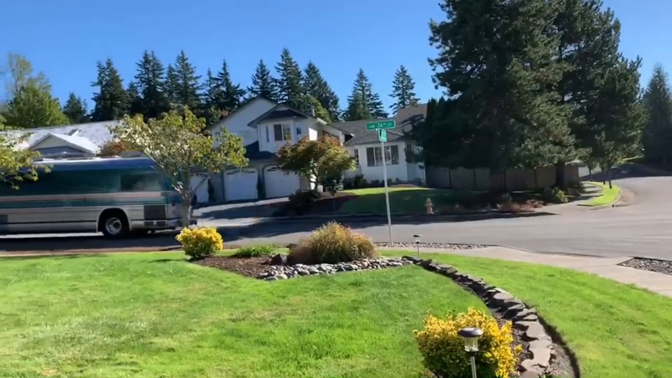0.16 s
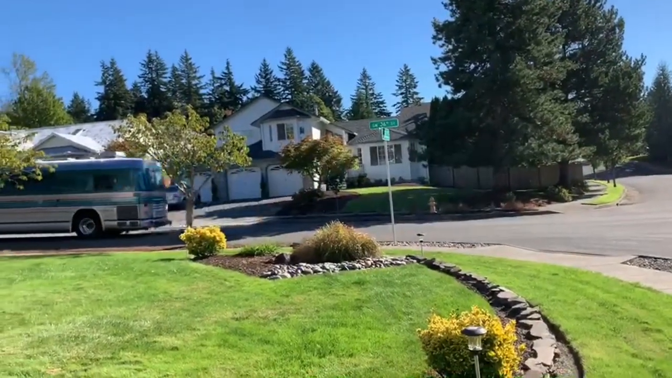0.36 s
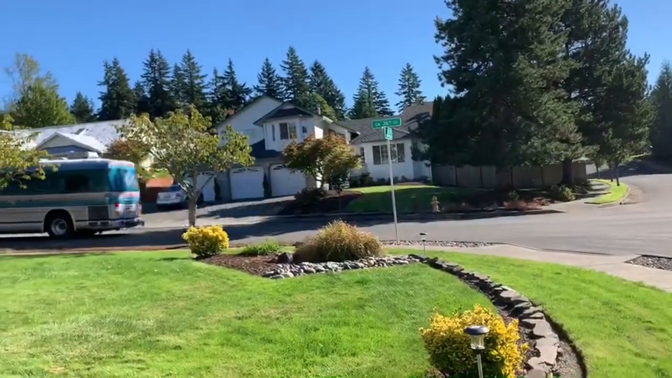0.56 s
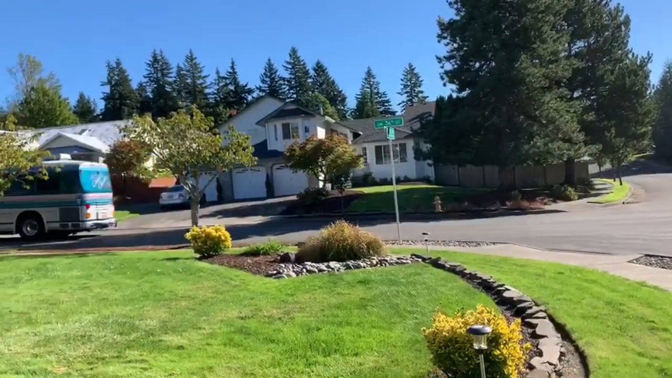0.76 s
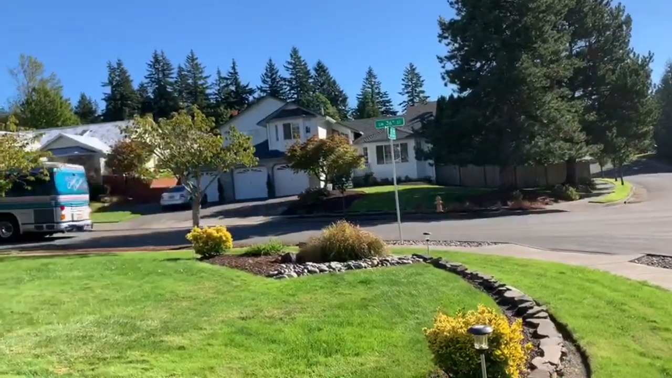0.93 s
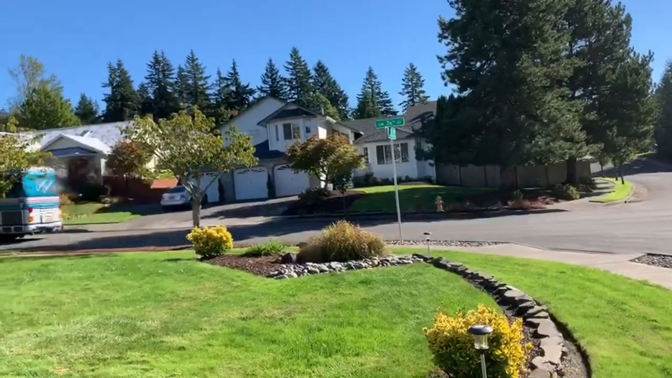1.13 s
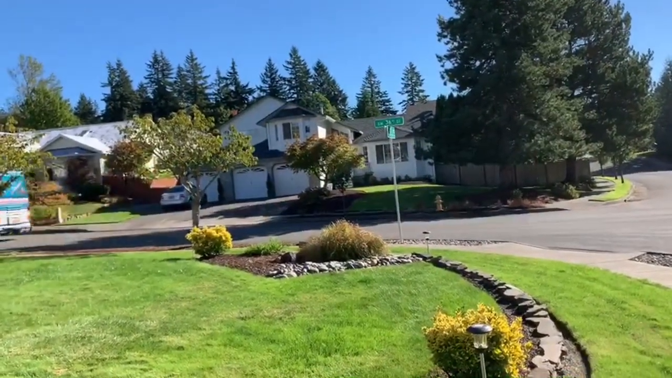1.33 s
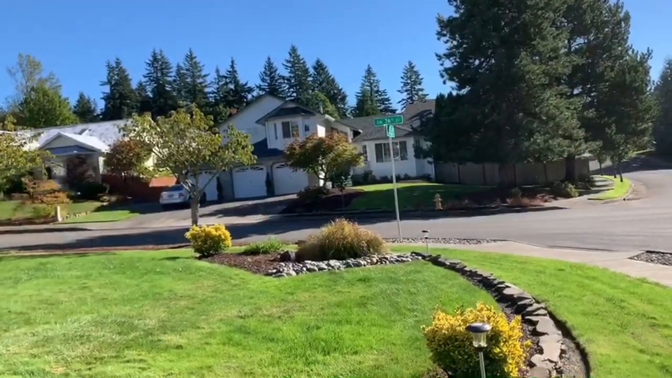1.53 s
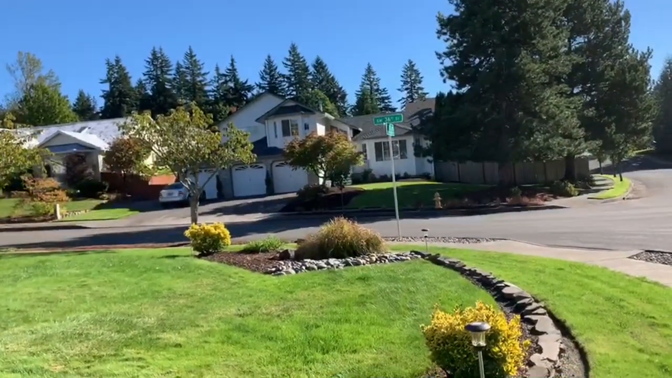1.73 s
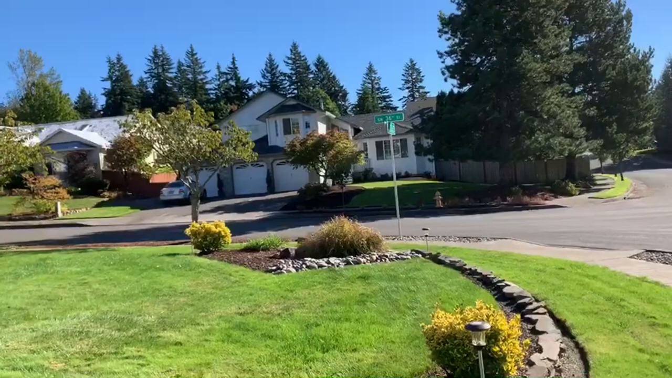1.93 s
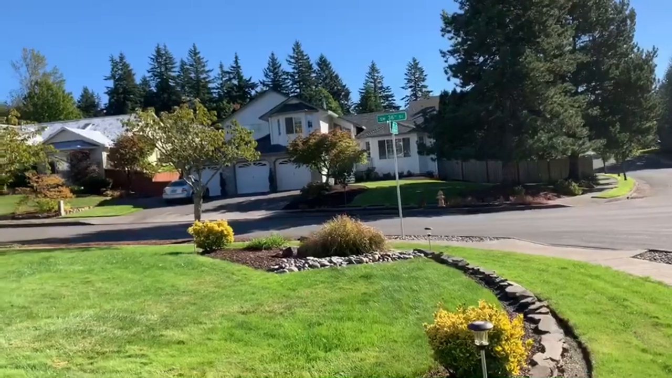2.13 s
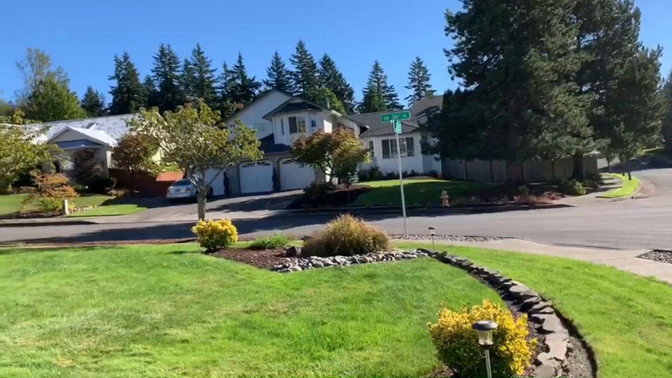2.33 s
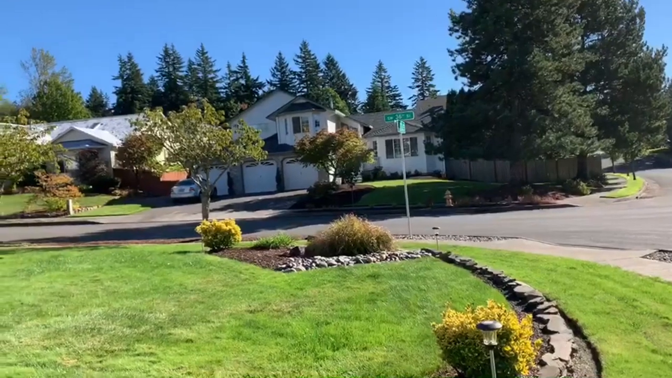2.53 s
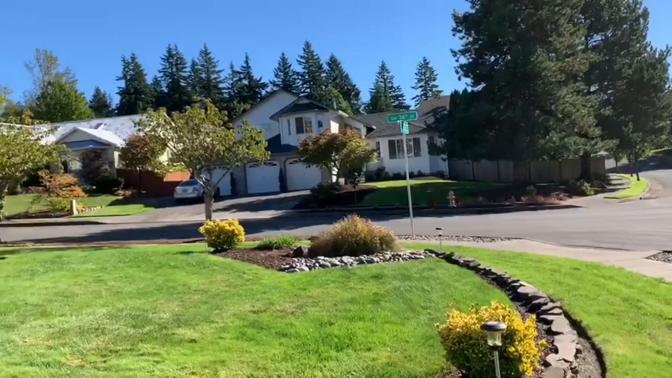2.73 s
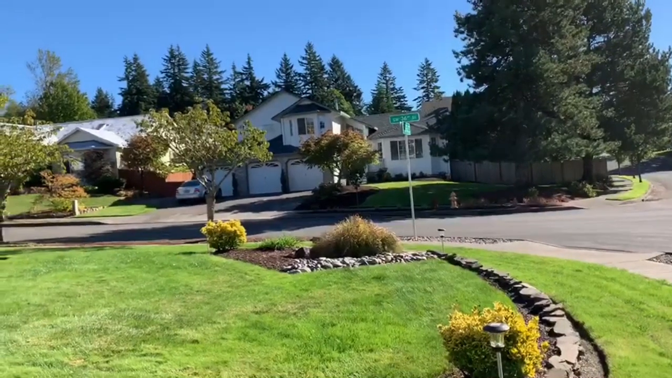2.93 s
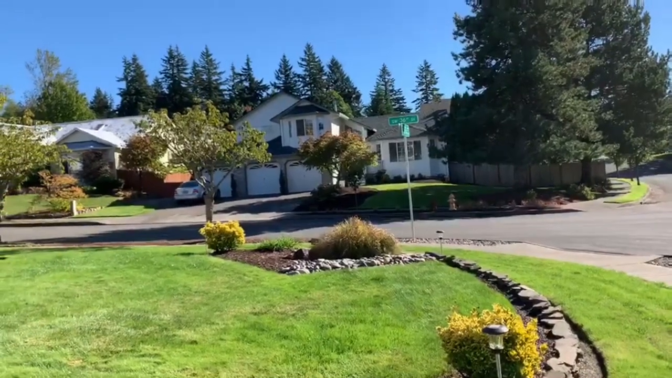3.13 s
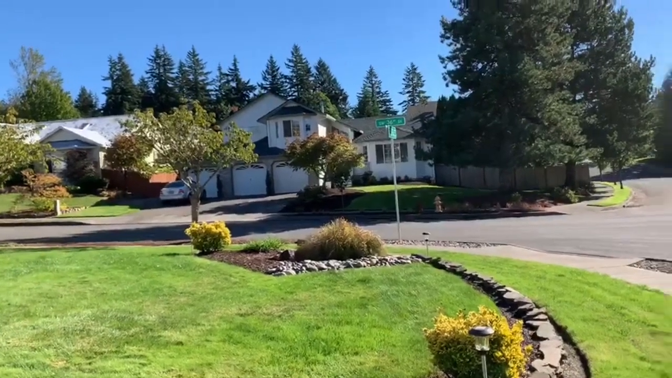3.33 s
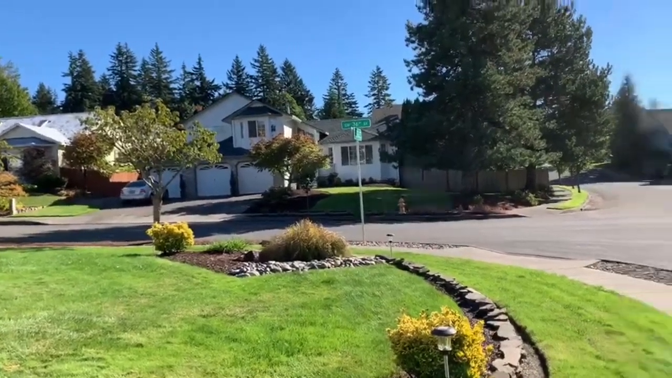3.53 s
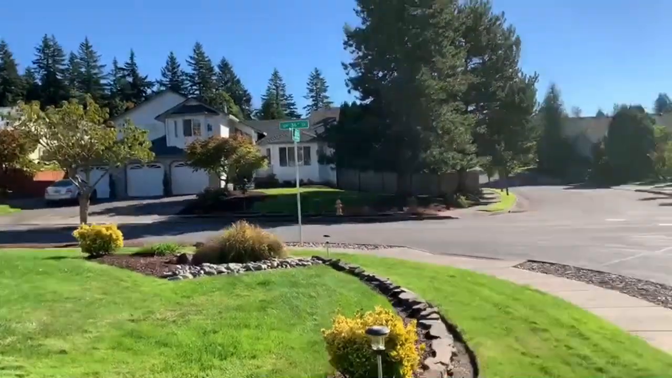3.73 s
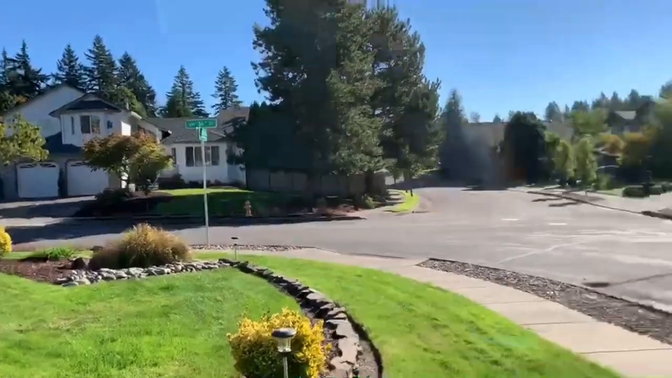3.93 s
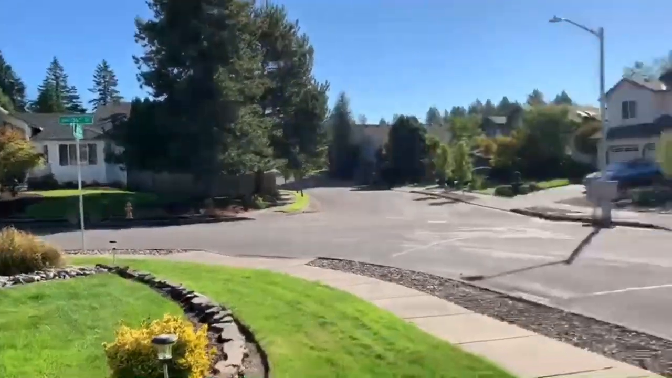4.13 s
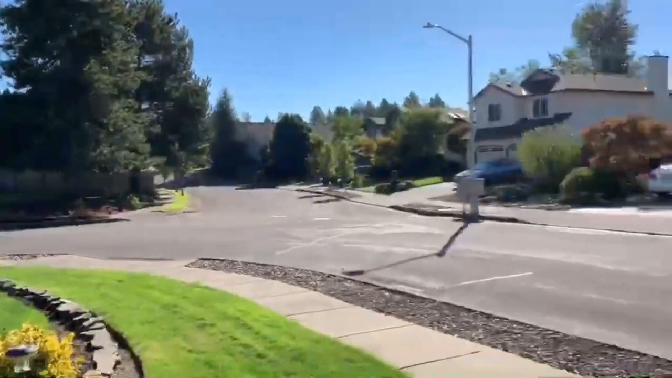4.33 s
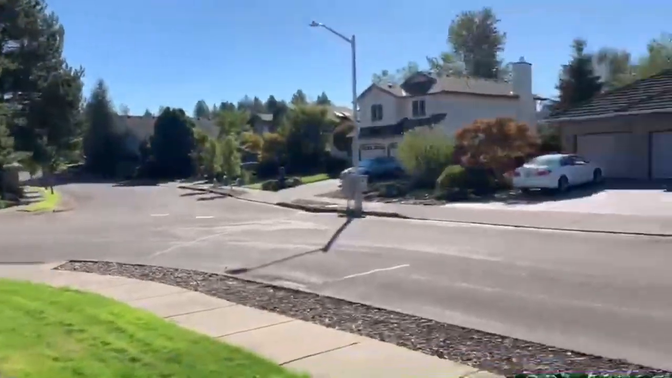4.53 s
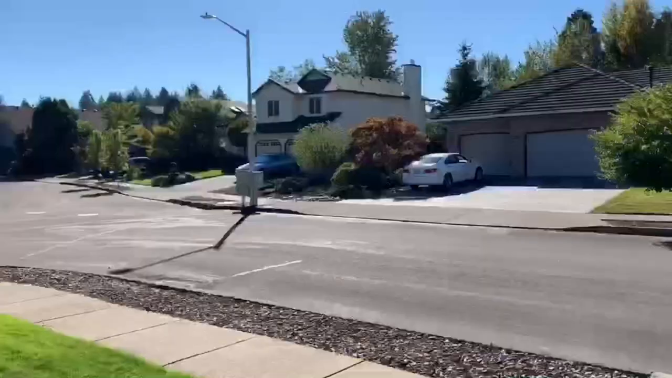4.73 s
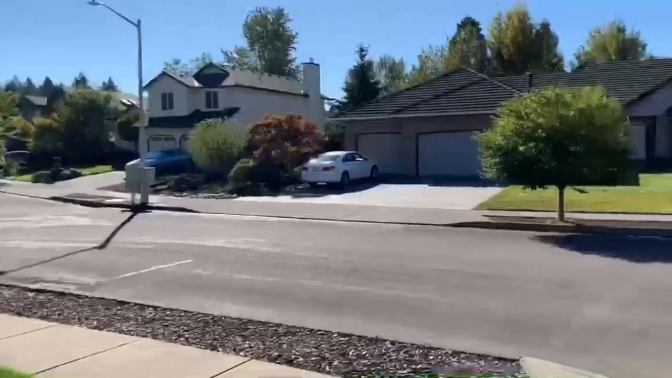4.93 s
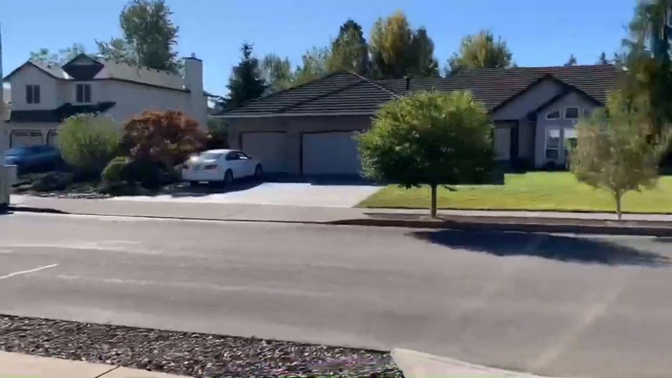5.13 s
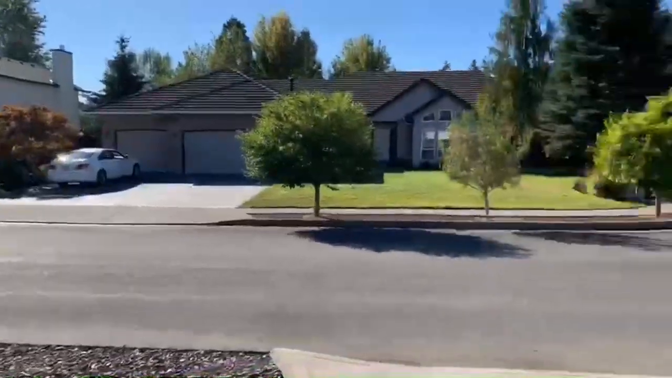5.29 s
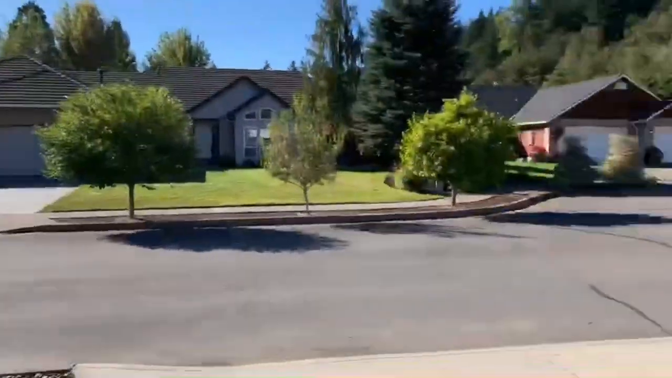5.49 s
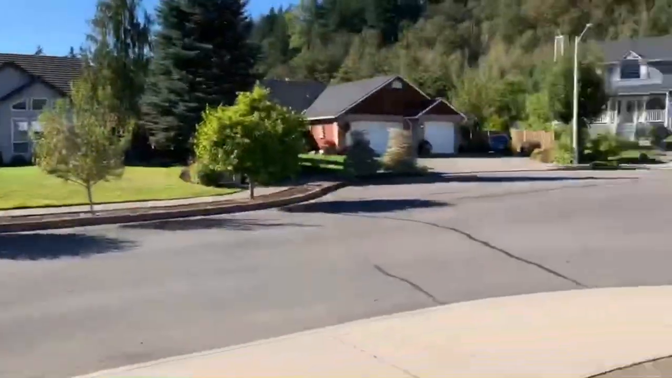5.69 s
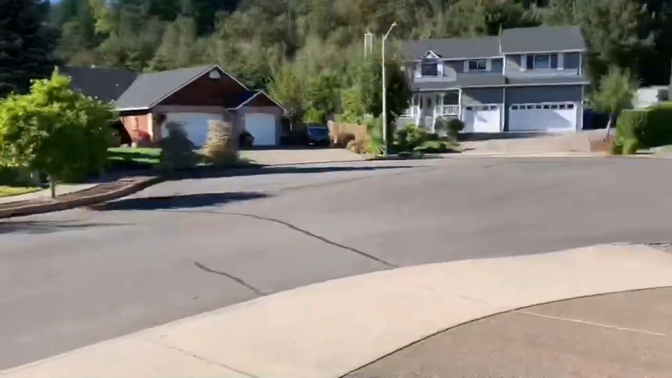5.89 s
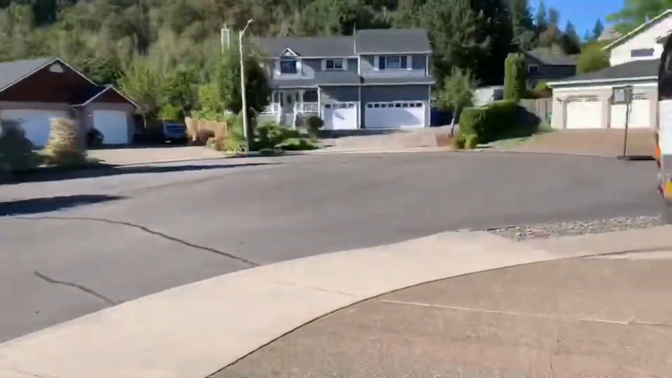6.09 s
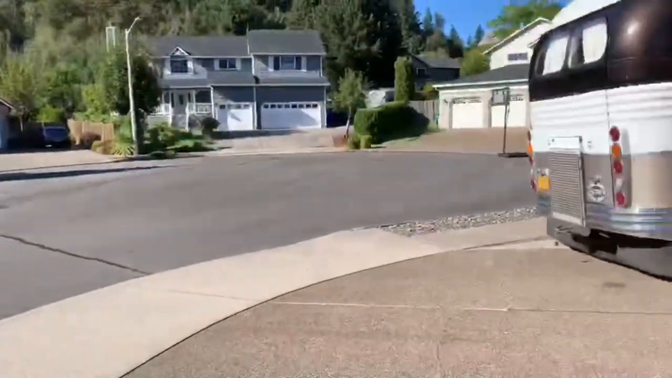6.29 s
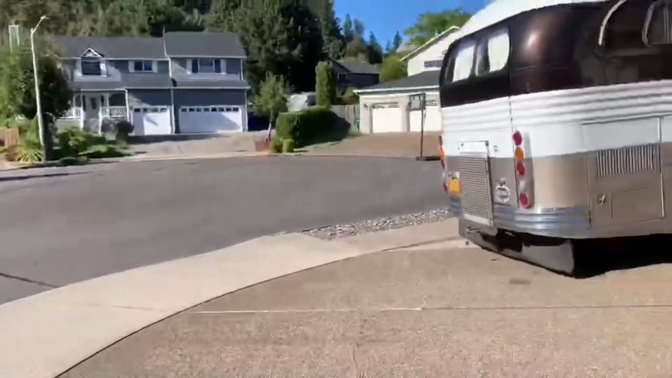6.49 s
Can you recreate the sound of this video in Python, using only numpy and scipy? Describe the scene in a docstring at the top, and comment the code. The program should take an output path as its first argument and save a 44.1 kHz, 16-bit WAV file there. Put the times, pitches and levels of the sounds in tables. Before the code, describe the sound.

A handheld phone in a front garden catches a large two-stroke diesel bus driving off, slightly left in stereo. Loud buzzing drone with uneven throbbing and fine mechanical clatter comes first, then a hollower, distant hum as the hiss disappears. Brief gusts rumble on the microphone and grainy rustles come from the right. The engine eases down, swelling and dipping, until little but quiet neighbourhood air and a small click remains.

```python
"""A deep exhaust drone swells and fades: an old coach pulls away up a suburban street, holds its revs, then eases off.
Its six-cylinder two-stroke diesel sounds partials locked to the crankshaft; moving echoes of house fronts make them beat.
Filtered noise, pulsed at each firing, gives the tailpipe's rasp and the engine's clatter and hiss, duller far off.
Low noise makes the coach's rumble and gusts on the microphone; hiss bursts are rustles of the phone as it swings round.
The phone's case ticks once, and a quiet neighbourhood lies behind it all."""
import sys
import numpy as np
from scipy import signal
from scipy.fft import rfft, irfft, next_fast_len
from scipy.io import wavfile
from scipy.ndimage import uniform_filter1d, map_coordinates

SR = 44100
rng = np.random.default_rng(int(sys.argv[2]) if len(sys.argv) > 2 else 0)


def transcribe(u):
    """Save the signal u as a 16-bit wav file named by the first command-line argument.

    u: samples, shape (n,) or (channels, n), limited to [-1, 1]; the rate is SR.
    q: integer samples, one column per channel.
    """
    v = np.clip(np.atleast_2d(u).T, -1, 1)
    q = np.round(v * 32767).astype(np.int16)
    wavfile.write(sys.argv[1], SR, q)


N = 288842
TIME = np.arange(N) / SR  # s

# crankshaft speed: (time [s], speed [revolutions per minute])
SPEED_CURVE = [(0, 1382), (0.6, 1411), (1.2, 1431), (2.2, 1452), (3, 1442), (4.95, 1442), (5.5, 1386),
               (6.55, 1275)]
# strength of each cylinder's puff, in firing order: level [dB]
CYLINDER_PUFFS = [-10, -4, -9, -13, -12, -6.5]
# common level curve of the engine bay's clatter and glare: (time [s], relative level [dB])
BAY_LEVEL = [(0, -40.5), (0.5, -35), (1.5, -38.5), (2.25, -36), (2.45, -41), (3.9, -43), (4.2, -46.5),
             (4.65, -43.5), (5.4, -50), (6.55, -52.5)]


def amp(db):
    """Logarithmic level: converts decibels to an amplitude ratio."""
    return 10 ** (np.asarray(db) / 20)


def unit(x):
    """Mean power: scales a signal to rms 1."""
    return x / np.sqrt(np.mean(x ** 2) + 1e-20)


def curve(rows, order=1):
    """Linear interpolation: one column of a time table, at every sample."""
    rows = np.asarray(rows)
    return np.interp(TIME, rows[:, 0], rows[:, order])


def ramp(span):
    """Linear transition: goes from 0 to 1 over a span of time."""
    return np.interp(TIME, span, [0, 1])


def drift(rate_hz):
    """Band-limited fluctuation: sixteen random sines no faster than the rate, summed to rms 1."""
    t = np.linspace(0, N / SR, 1300)
    hz, turn = rng.random((2, 16, 1))
    sines = np.sin(2 * np.pi * (rate_hz * hz * t + turn))
    return np.interp(TIME, t, unit(sines.sum(0)))


def colour(x, points):
    """Linear filtering: multiplies the spectrum by a gain given as (frequency [Hz], level [dB]) points."""
    size = next_fast_len(N)
    hz, db = np.transpose(points)
    bins_hz = np.fft.rfftfreq(size, 1 / SR)
    gain = amp(np.interp(np.log(bins_hz + 1), np.log(hz), db))
    return irfft(rfft(x, size) * gain, size)[..., :N]


def drone(turns, lead):
    """Harmonic radiation and interference: loud exhaust partials beat with house echoes, then with random scatter."""
    # the firing note swells and fades along the street: (time [s], level [dB])
    firing = [(0.06, -9), (0.91, -9.2), (1.14, -14.7), (1.39, -7.5), (1.71, -9.5), (1.96, -25.8),
              (2.15, -10.3), (2.6, -8), (3.1, -11.5), (3.8, -10), (4.09, -19), (4.44, -13.5), (5.17, -13.5),
              (5.39, -24), (5.55, -11), (5.74, -32), (5.87, -17.5), (6.25, -36.5), (6.37, -23), (6.5, -27)]
    # strong partials beside the firing note: (order [cycles per revolution], level pulling away [dB],
    # level at full revs [dB], level far off [dB], level coasting [dB]), before echoes and scatter
    strong = [(7, -26.5, -21.5, -26.5, -36.5), (8, -26, -28, -37, -47.5), (9, -22.5, -21.5, -38, -36.5),
              (12, -28.5, -24.5, -38.5, -50), (15, -33.5, -31, -42, -52.5)]
    # far down the street many weak echoes set in: (from [s], to [s])
    scatter_span = (3.0, 4.0)
    # the driver eases off: (from [s], to [s])
    easing = (4.94, 5.7)
    full_revs_s, far_s = 1.91, 3.85
    scatter, scatter_rate_hz, throb_scatter, scatter_db = 0.61, 5.5, 0.43, -0.6

    count = len(CYLINDER_PUFFS)
    scattered = ramp(scatter_span)
    out = amp(curve(firing)) * partial(turns, lead, count)
    for k, start_db, near_db, far_db, coasting_db in strong:
        times = [0, full_revs_s, far_s, *easing]
        db = np.interp(TIME, times, [start_db, near_db, far_db, far_db, coasting_db])
        share = scattered
        if k == count + 1:
            # the partial just above the firing note keeps up its throb until the driver eases off
            share = scattered * np.maximum(throb_scatter, ramp(easing))
        waver = scatter * share * (drift(scatter_rate_hz) + 1j * drift(scatter_rate_hz))
        path_gain = house_echoes(k * curve(SPEED_CURVE) / 60) + waver
        out += amp(db + scatter_db * share) * path_gain * partial(turns, lead, k)
    return out.real


def partial(turns, lead, k, flutter_db=0.42, jitter=0.0057):
    """Amplitude and phase modulation: one partial of k cycles a revolution at both ports, as a complex wave."""
    # the higher partials come partly as echoes from all sides, so they lean less to the left
    right_turns = turns - lead * (6 / k) * curve(SPEED_CURVE) / 60
    both = np.array([turns, right_turns])
    # no two firings are alike, and the higher partials show it more
    uneven_db = (flutter_db + 0.16 * (k - 6)) * drift(18)
    phase = jitter * (k - 5) * drift(28) - smear(k)
    # root two makes the real part's rms 1 before the flutter
    return np.sqrt(2) * amp(uneven_db) * np.exp(1j * (2 * np.pi * k * both + phase))


def smear(k):
    """Dispersion: the silencer delays each pitch differently, so the puffs come out rounded; phase lag [rad]."""
    return -np.pi * (k - 6) ** 2 / 5


def house_echoes(hz, reflect=1.13):
    """Interference: complex gain of a tone joined by echoes; changing paths make it beat, faster at higher pitch."""
    # a house front throws the note back while the coach passes: (time of greatest strength [s], half length [s],
    # extra path at that time [m], path growth [m/s], relative strength [ratio])
    houses = [(0.43, 1.05, 15.42, 3.77, 0.36), (1.47, 0.65, 17.53, -2.71, 0.40),
              (1.68, 0.6, 19.69, 2.73, 0.5), (2.37, 1.77, 17.17, 0.5, 0.28),
              (2.93, 1.07, 20.78, -0.84, 0.67), (3.18, 0.59, 20.42, 3.22, 0.36),
              (3.43, 0.79, 9.53, 0.9, 0.43)]
    sound_m_per_s = 343
    gain = 1
    for s, length, path, growth, strength in houses:
        delay = (path + growth * (TIME - s)) / sound_m_per_s
        passing = np.exp(-((TIME - s) / length) ** 2)
        gain = gain + reflect * strength * passing * np.exp(-2j * np.pi * hz * delay)
    return gain


def overtones(turns, lead, fade_db=3.5, scatter=0.49, far_loss_db=4.0, far_blur=0.8):
    """Harmonic series: weaker partials fade singly; far off the high ones weaken and echoes blur their pitch."""
    # weaker partials: (order [cycles per revolution], level relative to the pipe curve [dB])
    partials = [(3, -14.5), (4, -16.5), (5, -8), (10, -15.5), (11, -18), (13, -10), (14, -11.5),
                (16, -11.5), (17, -18), (18, -7.5), (19, -8), (20, -11.5), (21, -17), (26, -14.5),
                (27, -14.5), (28, -23.5), (32, -21), (33, -15), (36, -23.5), (39, -32), (42, -21)]
    # common level, greatest as the tailpipe swings toward the phone: (time [s], level [dB])
    pipe = [(0, -35.5), (1.0, -30.5), (2.1, -31), (2.7, -35), (3.1, -37.5), (5.0, -40), (5.5, -43.5),
            (6.55, -47)]
    both = np.array([turns, turns - .4 * lead * curve(SPEED_CURVE) / 60])
    far = np.interp(TIME, [2.4, 3.4, 5.2, 5.8], [0, .5, .6, 1])
    out = np.zeros((2, N))
    for k, db in partials:
        phase = .5 * drift(5) + far_blur * far * (k / 20) * drift(15) - smear(k)
        # phase difference between the ports
        apart = scatter * (k / 20) ** 2 * drift(4)
        level = np.sqrt(2) * amp(db + fade_db * drift(3.5) - far_loss_db * far * min(k / 13, 1))
        out += level * np.cos(2 * np.pi * k * both + phase + np.array([apart, -apart]) / 2)
    return out * amp(curve(pipe))


def rasp(turns, lead):
    """Turbulent jet noise: gas tears out of the tailpipe at each firing."""
    # spectra near and far: (frequency [Hz], relative density [dB per Hz])
    near_spectrum = [(100, -21), (170, -4), (250, 6.5), (420, 5), (530, -0.5), (650, 1), (850, 0.5),
                     (1100, -5.5), (1400, -9), (2000, -17.5), (3500, -46.5), (9000, -88.5)]
    far_spectrum = [(100, -25), (170, 4.5), (260, 3), (400, -4), (520, -1), (660, 2), (850, -8.5),
                    (1150, -8), (1450, -9), (2000, -31), (3500, -43.5), (9000, -91.5)]
    # (time [s], relative level [dB])
    exhaust = [(0, -29), (1.2, -30.5), (1.9, -33), (2.2, -34.5), (2.7, -38), (3.5, -41), (4.4, -39.5),
               (5.2, -42.5), (5.65, -49.5), (6.55, -54)]
    gas = street_noise(lead, direct=0.72, gate=puffs(turns, length=0.72, steady=0.24))
    far = np.interp(TIME, [2.3, 3.8], [0, 1])
    sound = (1 - far) * unit(colour(gas, near_spectrum)) + far * unit(colour(gas, far_spectrum))
    return sound * amp(curve(exhaust) + 2.5)


def puffs(turns, length, steady):
    """Impulsive excitation: each firing's burst decays over a share of the stroke; the cylinders are uneven."""
    count = len(CYLINDER_PUFFS)
    stroke = turns * count
    strength = amp(CYLINDER_PUFFS)[stroke.astype(int) % count]
    return steady + strength * np.exp(-(stroke % 1) / length)


def street_noise(lead, direct, gate, bend=0):
    """Direct and diffuse fields: pulsing noise from the coach's side plus smooth scatter from all around the street."""
    # the phone's body bends the wave toward the right port: (frequency [Hz], lag before scaling by bend [rad])
    body_lag = [(300, 0.24), (600, 0.89), (1000, .2), (1700, 0.15), (2350, 1.8), (3000, 0.17),
                (3800, -0.89), (5300, -0.67), (6500, -0.28)]
    direct, size = np.clip(direct, 0, 1), next_fast_len(N)
    straight = ports(echoes(gate * rng.standard_normal(N)), lead)
    lag = bend * np.interp(np.fft.rfftfreq(size, 1 / SR), *np.transpose(body_lag))
    straight[1] = irfft(rfft(straight[1], size) * np.exp(-1j * lag), size)[:N]
    scattered = rng.standard_normal((2, N))
    # direct is the share of power
    return np.sqrt(direct) * straight + np.sqrt(1 - direct) * scattered


def echoes(x, strength=0.5):
    """Comb filtering: kerb, cars and walls send late copies whose changing paths shift a ripple in the spectrum."""
    paths = [late + .00025 * drift(.9) for late in rng.uniform(.002, .014, 3)]  # delays, s
    copies = sum(ports(x, late)[1] for late in paths)
    return unit(x + strength * copies)


def ports(x, lead):
    """Arrival-time difference: the same wave at the left port and, lead seconds later, at the right."""
    late = map_coordinates(x, [np.arange(N) - lead * SR], order=3, mode="nearest")
    return np.array([x, late])


def clatter(turns, lead):
    """Pulsed broadband radiation: injectors, blower and fan rattle finely, duller with distance."""
    # spectra near and far: (frequency [Hz], relative density [dB per Hz])
    near_spectrum = [(700, -19), (1300, -4.5), (1750, 0.5), (2300, 2), (3000, -1.5), (3700, -1), (4600, -4),
                     (5600, -9.5), (7500, -31.5), (11000, -51.5)]
    far_spectrum = [(700, -25), (1300, -5.5), (1850, 5.5), (2400, 4.5), (3200, 1.5), (4200, -2), (5000, -9),
                    (6000, -13.5), (7500, -40.5), (13000, -76)]
    gate = puffs(turns, length=0.28, steady=0.53) * amp(1.2 * drift(40))
    near = unit(colour(street_noise(lead, direct=0.57, gate=gate, bend=0.95), near_spectrum))
    distant = unit(colour(street_noise(lead, direct=0.51, gate=gate), far_spectrum))
    far = np.interp(TIME, [2.4, 4.5], [0, 1])
    sound = np.sqrt(1 - far) * near + np.sqrt(far) * distant
    # a little stronger at the right port
    return sound * amp(curve(BAY_LEVEL) - 1.85) * amp([[-.7], [.7]])


def glare():
    """Resonance: three moving resonators in a row give a narrow, nasal engine band, alike at both ports."""
    # the band sinks as the coach turns away: (time [s], centre [Hz], level relative to the bay curve [dB])
    glare_band = [(0, 3200, -6), (.6, 2926, -6), (1.2, 2810, -7.5), (1.7, 2334, -7.5), (3.2, 2260, -8),
                  (4.1, 2165, -11.5), (4.65, 1840, -3.5), (5.15, 1830, 0), (5.5, 1890, -16)]
    band = rng.standard_normal(N)
    for _ in range(3):
        band = resonate(band, curve(glare_band, order=1), width_hz=670)
    return unit(band) * amp(curve(BAY_LEVEL) + curve(glare_band, order=2) - 4.0)


def resonate(x, hz, width_hz):
    """Heterodyning: shifts the curve hz down to zero, smooths with one pole and shifts back, a moving resonance."""
    turn = np.exp(2j * np.pi * np.cumsum(hz) / SR)
    r = np.exp(-np.pi * width_hz / SR)
    return 2 * (turn * signal.lfilter([1 - r], [1, -r], x / turn)).real


def fizz(turns):
    """Air absorption: the engine bay's highest hiss soon loses its top to the air."""
    # (frequency [Hz], relative density [dB per Hz])
    hiss_spectrum = [(3500, -27), (5500, 0), (6500, 3), (7500, -1.5), (8700, 2), (10000, -4.5), (11500, -2),
                     (15500, -22.5)]
    # (time [s], level [dB])
    hiss_level = [(0, -47), (0.5, -45), (1.5, -49), (2.25, -46), (2.42, -54), (3.9, -61.5), (4.2, -66.5),
                  (5.5, -70), (5.9, -88)]
    gate = puffs(turns, length=.25, steady=0.91)
    hiss = colour(street_noise(lead=0.000292, direct=1.0, gate=gate), hiss_spectrum)
    dull = colour(hiss, [(6500, -7.5), (9000, -9.5), (10500, -11.0), (13000, -34)])
    far = np.interp(TIME, [2.2, 3.6], [0, 1])
    sound = (1 - far) * unit(hiss) + far * unit(dull)
    return sound * amp(curve(hiss_level) + 0.57 * drift(21))


def shimmer(x, patchy_db=1.5):
    """Turbulent scintillation: moving air lifts and sinks patches of the spectrum."""
    z = signal.stft(x, nperseg=512)[2]
    field = rng.standard_normal(z.shape[1:])
    # patches a few hundred Hz wide and a tenth of a second long
    field = uniform_filter1d(field, size=4, axis=0)
    field = unit(uniform_filter1d(field, size=20, axis=1))
    return signal.istft(z * amp(patchy_db * field))[1][:, :N]


def rumble(lumps_db=1.9):
    """Power addition: the coach's fading rumble and gusts share lumpy low noise, nearly alike at both ports."""
    # (frequency [Hz], relative density [dB per Hz])
    low_spectrum = [(15, -28), (30, -18.5), (45, -3), (65, 3.5), (100, 4), (130, 4.5), (200, -5.5),
                    (350, -24.5), (700, -72), (4000, -120)]
    air = rng.standard_normal(N) + .45 * rng.standard_normal((2, N))
    coach = amp(-35 - TIME)  # sinks 1 dB per second
    level = np.hypot(coach, gusts())
    return unit(colour(air, low_spectrum)) * level * amp(lumps_db * drift(13))


def gusts():
    """Transient envelope: each gust on the microphone rises fast, holds and dies away exponentially."""
    # (start [s], hold counted from the start [s], level [dB])
    gust_rows = [(3.996, 0.06, -29.5), (4.42, 0.14, -29.5), (4.613, 0.1, -22), (4.81, 0.063, -27),
                 (4.955, 0.059, -35), (5.107, 0.46, -25)]
    rise_s, fall_s = 0.011, 0.035
    level = 0
    for s, hold, db in gust_rows:
        rise = np.clip((TIME - s) / rise_s, 0, 1)
        fall = np.exp(-np.maximum(TIME - s - hold, 0) / fall_s)
        level = level + amp(db) * rise * fall
    return level


def rustles():
    """Friction noise: brief swells of grainy hiss as the phone swings round, close by on the right."""
    # (time of the middle [s], half length [s], centre [Hz], relative level [dB])
    rustle_rows = [(3.981, 0.18, 4370, -48.5), (4.38, 0.17, 4870, -51.5), (4.593, 0.11, 6400, -55)]
    out = np.zeros((2, N))
    for s, length, hz, db in rustle_rows:
        band = [(hz / 2, -28), (hz * 0.78, -6), (hz, 0), (hz * 1.08, -6), (hz * 2, -45)]
        hiss = colour(rng.standard_normal((2, N)), band)
        swell = np.exp(-((TIME - s) / length) ** 2)
        out += unit(hiss) * amp(db + 1.7 * drift(90)) * swell
    return out * amp([[-3], [2]])


def ticks(decay_s=0.0038):
    """Damped impulse: a short, dry click from the handled phone's case, as decaying filtered noise."""
    # (time [s], relative level [dB])
    tick_rows = [(6.1839, -38.5)]
    burst = sum(amp(db + 5.5) * (TIME >= s) * np.exp(-abs(TIME - s) / decay_s) for s, db in tick_rows)
    case = [(400, -12), (1700, 8), (3800, 2), (5500, -16), (8000, -29), (14000, -35)]
    return colour(burst * rng.standard_normal((2, N)), case)


def street(db=-57):
    """Diffuse field: faraway traffic and air in the trees, as independent noise at the two ports."""
    # the quiet neighbourhood: (frequency [Hz], relative density [dB per Hz])
    street_spectrum = [(20, -5), (45, 12), (90, 7), (200, 1.5), (500, 1), (1000, 7.5), (1600, -6.5),
                       (3000, -12.5), (5000, -20.5), (8000, -37), (15000, -44)]
    air = rng.standard_normal((2, N))
    return unit(colour(air, street_spectrum)) * amp(db + .8 * drift(1.9))


def scene():
    """Superposition: one crankshaft drives the exhaust note and the pulsed noise; the other layers add to them."""
    # the coach reaches the left port first: (time [s], lead [s])
    left_lead = [(0, 0.00017), (3.3, 0.00037), (3.9, 0.00045), (6.55, 0.0005)]
    turns = np.cumsum(curve(SPEED_CURVE)) / 60 / SR  # crankshaft revolutions so far
    lead = curve(left_lead)
    note = drone(turns, lead) + overtones(turns, lead)
    noise = shimmer(rasp(turns, lead) + clatter(turns, lead) + glare() + fizz(turns) + street())
    return note + noise + rumble() + rustles() + ticks()


def record(dry):
    """Band limitation: the recorder's linear-phase low-pass with its edge at 15800 Hz."""
    low_pass = signal.firwin(511, 15800, window=("kaiser", 9), fs=SR)
    return signal.oaconvolve(dry, low_pass[None], "same")


dry = scene()
out = record(dry)
transcribe(out)
```